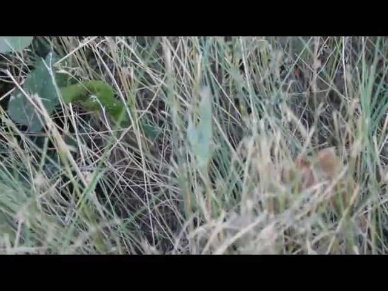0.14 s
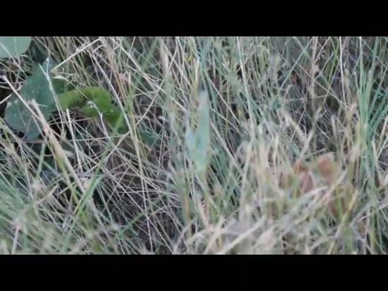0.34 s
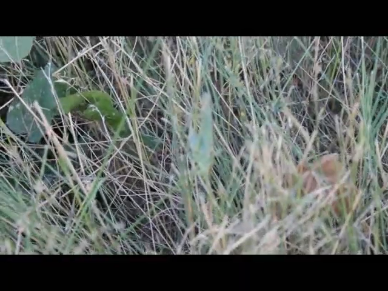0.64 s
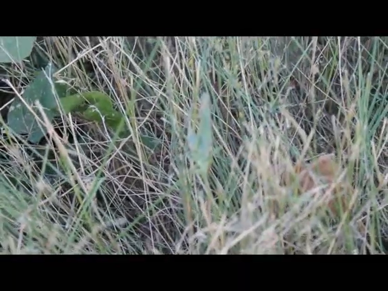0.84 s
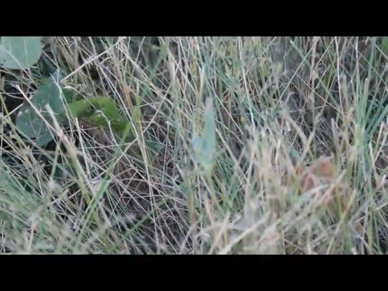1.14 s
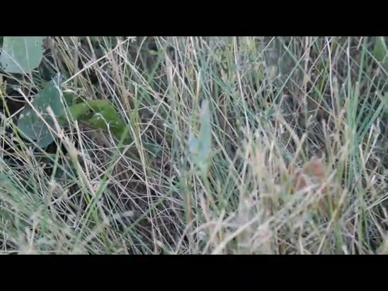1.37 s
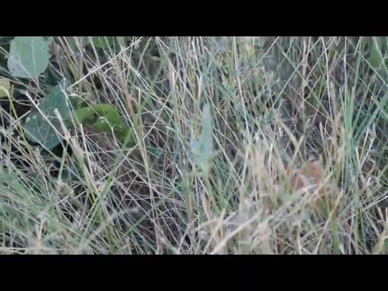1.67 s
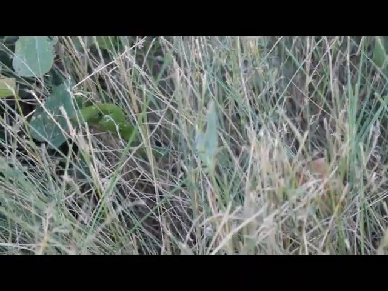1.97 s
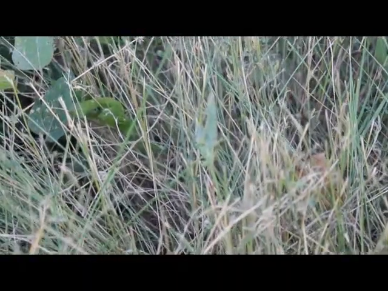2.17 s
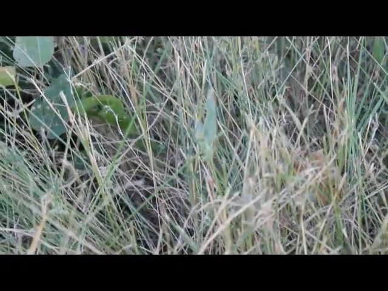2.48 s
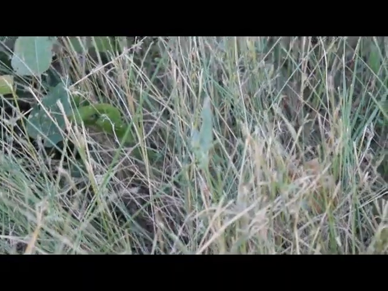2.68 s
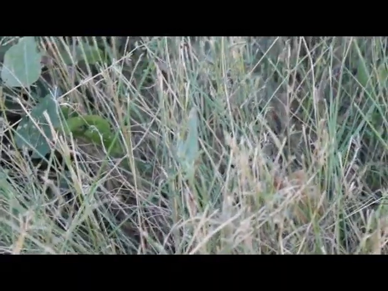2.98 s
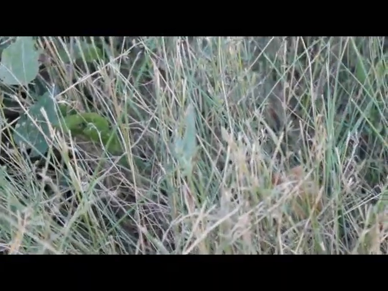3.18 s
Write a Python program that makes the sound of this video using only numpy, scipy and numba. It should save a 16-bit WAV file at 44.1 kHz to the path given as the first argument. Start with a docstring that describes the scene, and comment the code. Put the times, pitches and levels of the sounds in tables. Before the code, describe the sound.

Rapid, very high, scratchy bush-cricket trill from start to end, outdoors in dry grass, heard close with slightly crunchy, compressed sound on the right side only; soft distant chirps and faint hiss lie beneath.

```python
"""Bush-cricket in tall grass

A bush-cricket trills close by: each wing cycle is a soft opening buzz, a closing stroke, a reopening buzz
and a second closing stroke. Every tooth struck rings the wing briefly, and the grass echoes it.
A farther insect chirps in rattles of clicks, over a faint chorus of hiss, with a few low clicks.
One microphone, wired to the right channel, with a fast gain control."""
import sys
import numpy as np
from scipy import signal
from scipy.fft import rfft, irfft, next_fast_len
from scipy.io import wavfile
from scipy.ndimage import uniform_filter1d, map_coordinates
from numba import njit

SR = 44100
rng = np.random.default_rng(int(sys.argv[2]) if len(sys.argv) > 2 else 0)


def to_wav(sig):
    """Store sig (one row per channel, or 1-D mono) as 16-bit WAV at the path in sys.argv[1].

    Samples outside -1..1 are clipped; the rate is SR.
    """
    pcm = np.clip(np.atleast_2d(sig), -1, 1) * 32767
    pcm = np.round(pcm).astype(np.int16)
    wavfile.write(sys.argv[1], SR, pcm.T)  # frames by channels


def magnitude_from_level(level_db):
    """Linear magnitude for a level in decibels (20 dB per decade)."""
    exponent = np.asarray(level_db, float) / 20
    return 10 ** exponent


N = 146412  # length of the sound in samples


def cricket():
    """Four wing movements per cycle, two opening and two closing, plus the echo of the grass."""
    # first and second closing strokes: last_tooth_s, length_s, level_db, pitch_hz (before evening out)
    first_strokes = [(0.0011, 0.0049, 4.5, 11400), (0.0764, 0.018, -3.5, 11000), (0.1515, 0.016, 3, 11000),
                     (0.223, 0.015, -6.5, 9700), (0.3004, 0.014, -1, 10800), (0.3754, 0.016, -1, 11200),
                     (0.4516, 0.0142, -1, 11000), (0.5255, 0.015, -1.5, 11200),
                     (0.6016, 0.013, -0.5, 10600), (0.6802, 0.022, -0.5, 10900),
                     (0.7582, 0.027, -1.5, 10540), (0.833, 0.025, -4.4, 11400),
                     (0.9066, 0.016, -2.5, 11000), (0.9835, 0.019, -2, 11100), (1.0612, 0.019, 0.5, 11400),
                     (1.135, 0.019, -5, 11000), (1.2096, 0.016, -1.5, 11090), (1.2876, 0.021, -3, 10900),
                     (1.3617, 0.015, -3.5, 11190), (1.4371, 0.018, -5.3, 10700), (1.5103, 0.011, 0, 10900),
                     (1.5878, 0.015, -0.5, 10650), (1.6622, 0.0151, 1, 10760), (1.7377, 0.02, -2, 10530),
                     (1.8106, 0.014, -2.5, 11200), (1.8885, 0.023, -2, 10600), (1.9645, 0.018, -2, 11300),
                     (2.039, 0.015, -1, 11200), (2.1132, 0.018, -2, 10700), (2.1884, 0.019, -2, 10800),
                     (2.2627, 0.0148, -1, 10440), (2.3396, 0.017, -2.5, 10500), (2.415, 0.018, -3.5, 10950),
                     (2.4915, 0.019, -3.5, 10700), (2.567, 0.018, -3, 11200), (2.6424, 0.017, -3.5, 11000),
                     (2.7178, 0.015, -1, 10800), (2.7914, 0.011, -0.5, 11200), (2.8665, 0.018, -2.5, 10400),
                     (2.941, 0.015, -3.5, 10300), (3.018, 0.015, -1.5, 11000), (3.093, 0.017, -1, 10700),
                     (3.1674, 0.017, -4, 11400), (3.2444, 0.02, -3.5, 10450), (3.3187, 0.015, -3.5, 10800)]
    second_strokes = [(0.0278, 0.013, -8, 11800), (0.1008, 0.015, -7, 12150), (0.1763, 0.017, -8, 12200),
                      (0.2502, 0.0157, -10, 12600), (0.3259, 0.016, -6, 12700), (0.3993, 0.015, -9, 12200),
                      (0.4768, 0.015, -6.5, 12500), (0.5502, 0.0141, -6.5, 11800),
                      (0.6256, 0.014, -9, 11800), (0.703, 0.018, -8, 12350), (0.7797, 0.018, -11, 12200),
                      (0.8559, 0.014, -11, 11700), (0.9331, 0.0168, -8, 12400),
                      (1.0095, 0.017, -8.5, 12300), (1.0843, 0.018, -9, 12500),
                      (1.1604, 0.018, -10.5, 11900), (1.2346, 0.017, -8.5, 11960),
                      (1.3078, 0.013, -8.5, 11710), (1.3871, 0.0158, -8, 12300), (1.4606, 0.013, -9, 11930),
                      (1.5373, 0.012, -7.5, 12020), (1.6124, 0.015, -9.5, 12300),
                      (1.6857, 0.012, -9, 12120), (1.7613, 0.013, -8, 12200), (1.8368, 0.017, -9, 11600),
                      (1.9111, 0.013, -10, 11700), (1.9889, 0.015, -9.5, 11760.0),
                      (2.063, 0.015, -7, 12300), (2.1383, 0.015, -9.5, 12020), (2.2102, 0.0124, -7, 12070),
                      (2.2856, 0.013, -9, 11900.0), (2.3617, 0.012, -10.5, 11390),
                      (2.4391, 0.017, -10, 12300), (2.5167, 0.019, -10.5, 12000),
                      (2.5913, 0.019, -10, 11340), (2.667, 0.015, -9, 11900), (2.7433, 0.017, -11, 11750),
                      (2.8188, 0.015, -7.5, 11900), (2.8903, 0.015, -10, 12150), (2.9654, 0.013, -9, 11730),
                      (3.0412, 0.014, -10, 11600), (3.1171, 0.014, -6.5, 12080.0),
                      (3.193, 0.018, -9.5, 12200), (3.2675, 0.015, -8.5, 11660.0)]
    # teeth counted back from the end of a stroke:
    # gap_ms (to the tooth struck after it, before stretching), ring_ms, pitch_ratio
    first_teeth = [(0, .11, 1), (1.75, .11, 1.03), (1.95, .105, 1.03), (1.75, .1, 1.02), (1.4, .09, 1.03),
                   (1.1, .075, 1.06), (.65, .065, 1.07), (.7, .065, 1.06), (1.05, .075, 1.06),
                   (1.3, .075, 1.05), (1.2, .075, 1.04), (1.05, .075, 1.04), (1.15, .075, 1.03),
                   (1.25, .09, .98), (1.6, .09, .95), (1.7, .09, .94)]
    second_teeth = [(0, .12, 1), (2.3, .115, .99), (2.35, .11, .98), (2.15, .105, .96), (1.85, .1, .94),
                    (1.55, .09, .94), (1.3, .08, .95), (1.1, .07, .95), (.95, .065, .95), (.85, .065, .96),
                    (.8, .065, .96), (.8, .065, .96)]
    # strength of those same teeth, added to the level of the stroke: strength_db
    first_teeth_db = [5.5, 9, 8.5, 8.5, 8, 0.5, 7, 3.5, -4, -2, -7, -8, -5.5, -14, -8.5, -8]
    second_teeth_db = [12.9, 20.2, 18.6, 19.2, 18.6, 15.2, 11.8, 16, 12.8, 13.4, 8.5, 7]
    # wing openings before the first strokes: time_s, level_db, pitch_hz
    opening_buzzes = [(0.051, -18, 10200), (0.1261, -13.5, 9960), (0.2, -14, 9500), (0.2752, -16, 9700),
                      (0.354, -16, 8360), (0.4263, -17, 9200), (0.5054, -17.5, 8600),
                      (0.5806, -14.5, 9170.0), (0.6532, -16, 9050), (0.73, -14, 9000), (0.8086, -17, 8700),
                      (0.8807, -12.5, 9400), (0.9605, -18.5, 8700), (1.037, -14, 9400), (1.11, -17, 8600),
                      (1.1853, -16, 9600), (1.259, -18, 8800), (1.3382, -18, 8820.0), (1.4133, -18, 9300),
                      (1.489, -27, 9700), (1.564, -21, 9570.0), (1.639, -25, 9600), (1.714, -20.6, 9800),
                      (1.7864, -20, 9600), (1.8642, -12.5, 9200), (1.9378, -15, 9510), (2.013, -12, 9600),
                      (2.0905, -14.5, 8970), (2.1651, -13, 9150), (2.2403, -11, 9140),
                      (2.3123, -18, 9650.0), (2.3893, -20, 9760.0), (2.4649, -15, 9360),
                      (2.5415, -15, 9460), (2.6181, -18.5, 9510), (2.6932, -18, 9640), (2.7682, -19, 9870),
                      (2.8451, -16, 9140), (2.9206, -18, 8940), (2.9933, -18, 9250), (3.068, -14, 9530),
                      (3.1426, -14.5, 9800), (3.2182, -16, 9480), (3.295, -15, 9690.0)]
    reopen_ms, reopen_slack_s = 6.2, 0.001  # delay after the first stroke's last tooth, its scatter
    reopen_db, reopen_hz = -10, 10000
    grass_db, grass_t60_s = -16, 0.043  # echo scattered by the stalks

    stroke_ends = np.transpose(first_strokes)[0]
    slack = reopen_slack_s * rng.standard_normal(len(stroke_ends))
    reopen_s = stroke_ends + reopen_ms / 1000 + slack
    same = np.ones(len(stroke_ends))

    song = closings(first_strokes, first_teeth, first_teeth_db)
    song += closings(second_strokes, second_teeth, second_teeth_db)
    song += openings(*np.transpose(opening_buzzes))
    song += openings(reopen_s, reopen_db * same, reopen_hz * same)
    return song + magnitude_from_level(grass_db) * scatter(song, grass_t60_s)


def closings(strokes, teeth, teeth_db):
    """The scraper strikes as many teeth as fit the stroke, and each one rings three modes of the wing."""
    # side modes of the wing: pitch_ratio, level_db
    side_modes = [(0.858, -8.5), (1.199, -16)]
    gap_scatter, pitch_scatter = 0.1, 0.012  # random shares
    size_scatter_db = 1.3
    sag = 0.063  # share by which the pitch starts high and then falls within a ring
    main_mode = (1, 0.045)  # pitch ratio, dB

    gap_ms, ring_ms, ratio = np.transpose(teeth)
    end, length, stroke_db, end_hz = np.transpose(strokes)[:, :, None]
    luck = rng.standard_normal((len(strokes), 3, len(teeth)))

    # time from each tooth to the stroke's end, stretched so that the earliest tooth struck fits the length
    back = np.cumsum(gap_ms / 1000 * np.exp(gap_scatter * luck[:, 0]), 1)
    earliest = np.abs(back - length).argmin(1)[:, None]
    back = back * length / np.take_along_axis(back, earliest, 1).clip(1e-4)
    struck = np.arange(len(teeth)) <= earliest

    # each stroke's pitch lies halfway between its own value and the average
    even_hz = (end_hz + np.mean(end_hz)) / 2
    hz = (even_hz * ratio * np.exp(pitch_scatter * luck[:, 1]))[struck]
    db = (stroke_db + teeth_db + size_scatter_db * luck[:, 2])[struck]
    s = (end - back)[struck]
    ring_ms = (ring_ms + 0 * back)[struck]

    sound = np.zeros(N)
    for mode_ratio, mode_db in [main_mode] + list(side_modes):
        sound += rings(s, db + mode_db, ring_ms, hz * mode_ratio, sag, size=90)
    return sound


def openings(s, db, hz):
    """Nine lightly brushed teeth blur into a narrow buzz, strongest near its start, with a thin scratch."""
    buzz_ms, buzz_ring_ms = 6.3, 0.3
    pitch_scatter, pitch_rise = 0.03, 0.026  # shares
    scratch_hz, scratch_db, scratch_ring_ms = 13500, -10, 0.197
    scratch_spread_s = 0.011

    place = rng.random((len(s), 9))  # 0 at the start of the buzz, 1 at its end
    luck = rng.standard_normal((len(s), 9))
    when = s[:, None] + buzz_ms / 1000 * (place ** 1.5 - 0.3)
    size_db = (db[:, None] - 8 * place).ravel()
    pitch = hz[:, None] * np.exp(pitch_scatter * luck + pitch_rise * (place - 0.35))
    buzz_ring = np.full(when.size, buzz_ring_ms)
    buzz = rings(when.ravel(), size_db, buzz_ring, pitch.ravel(), 0, size=200)

    scratch_pitch = scratch_hz * np.exp(0.1 * rng.standard_normal(when.shape)).clip(0.7, 1.3)
    scratch_s = s[:, None] + scratch_spread_s * (rng.random(when.shape) - 0.5)
    scratch_ring = np.full(when.size, scratch_ring_ms)
    scratch = rings(scratch_s.ravel(), size_db + scratch_db, scratch_ring, scratch_pitch.ravel(), 0, size=120)
    return buzz + scratch


def rings(s, db, ring_ms, hz, sag, size):
    """Ringing bursts that swell to their peak at times s in three ring times, then die; pitch may sag."""
    start = (s - 3 * ring_ms / 1000) * SR
    k = np.floor(start)[:, None] + np.arange(1, size + 1)  # sample numbers of each burst
    t = (k - start[:, None]) / SR
    u = t / (ring_ms[:, None] / 1000)  # age in ring times
    bend = 1 + sag * (1 - u / 6).clip(-1)
    phase = 2 * np.pi * (hz[:, None] * t * bend + rng.random((len(s), 1)))
    envelope = (u / 3) ** 3 * np.exp(3 - u)
    wave = magnitude_from_level(db)[:, None] * envelope * np.sin(phase)
    inside = (k >= 0) & (k < N)
    return np.bincount(k[inside].astype(int), wave[inside], N)


def scatter(x, t60):
    """A dense cloud of echoes that falls 60 dB in t60 seconds, drawn anew every 75 ms."""
    out = np.zeros(N + SR)
    step = 3308  # 75 ms in samples
    t = np.arange(SR // 5) / SR
    for a in range(0, N, step):
        tail = rng.standard_normal(len(t)) * magnitude_from_level(-60 * t / t60)
        wet = signal.fftconvolve(x[a:a + step], tail / np.linalg.norm(tail))
        out[a:a + len(wet)] += wet
    return out[:N]


def far_chirps():
    """A farther insect: rattles of nearly steady clicks ring two modes, half lost in echoes."""
    # far chirps: start_s, length_s, level_db
    chirps = [(.0004, 0.056, -29), (0.177, 0.086, -26.5), (0.384, 0.1, -29.5), (0.589, 0.11, -29),
              (0.793, 0.088, -29.5), (1.002, 0.078, -31.5), (1.181, 0.088, -29.5), (1.3905, .12, -29),
              (1.5586, 0.17, -32.5), (1.786, 0.11, -28), (1.9886, 0.074, -28), (2.168, 0.09, -28.5),
              (2.337, 0.12, -30.5), (2.5673, 0.093, -29.5), (2.75, 0.11, -33.5), (2.939, 0.1, -29.5),
              (3.181, 0.11, -30)]
    # what each click rings: pitch_hz, level_db, ring_ms
    click_modes = [(5060, 0.5, 0.292), (2497, -15, 0.395)]
    clicks_per_s, edge_s = 197.5, 0.0097  # edge: time to fade in or out
    time_scatter_s, size_scatter_db, pitch_scatter = 0.000292, 1.4, 0.04
    echo_db, echo_t60_s = 3, 0.089

    start, length, chirp_db = np.transpose(chirps)[:, :, None]
    t = np.arange(30) / clicks_per_s + 0 * start
    luck = rng.standard_normal((len(chirps), 3, 30))
    # clicks past the end of the chirp are left at -80 dB
    swell = np.clip(np.minimum(t + 0.0036, length - t) / edge_s, 1e-4, 1)
    s = (start + t + time_scatter_s * luck[:, 0]).ravel()
    db = (chirp_db + 20 * np.log10(swell) + size_scatter_db * luck[:, 1]).ravel()
    detune = np.exp(pitch_scatter * luck[:, 2].ravel())

    dry_rattle = np.zeros(N)
    for hz, mode_db, ring_ms in click_modes:
        dry_rattle += rings(s, db + mode_db, np.full(s.size, ring_ms), hz * detune, 0, size=260)
    return dry_rattle + magnitude_from_level(echo_db) * scatter(dry_rattle, echo_t60_s)


def low_clicks():
    """Faint low clicks, each a brief ring."""
    # low clicks: time_s, level_db, pitch_hz, ring_ms
    click_rings = [(1.652, -38.5, 191, 1.2), (1.652, -35.5, 1440, 0.72), (2.11, -32, 910, 1.1)]
    s, db, hz, ring_ms = np.transpose(click_rings)
    return rings(s, db, ring_ms, hz, 0, size=1200)


def chorus():
    """Distant insects and air: hiss shaped in pitch, with a gently fluttering level."""
    # color of the hiss: pitch_hz, relative_level_db
    color = [(20, -45), (60, -16), (317, -13), (800, -17), (1700, -18.5), (2350, -7.5), (3100, -7.5),
             (3750, -15), (4400, -1.5), (4950, 3.5), (5500, -3), (6300, -11.5), (8000, -5), (11000, -2),
             (13500, -9.5), (15800, -9)]
    level_db, flutter_db = -33.5, 1.5
    flutter_step = 1500  # samples between random levels, 34 ms

    hz, db = np.transpose(color)
    noise = rng.standard_normal(N)
    hiss = filtered(noise, lambda f: magnitude_from_level(np.interp(np.log(f + 1), np.log(hz + 1), db)))
    random_levels = rng.standard_normal(N // flutter_step + 4)
    flutter = map_coordinates(random_levels, [np.arange(N) / flutter_step])
    return magnitude_from_level(level_db + flutter_db * flutter) * hiss / hiss.std()


def filtered(x, gain):
    """Make each pitch in x louder or softer by gain(frequency in Hz)."""
    m = next_fast_len(N + 8192)
    return irfft(rfft(x, m) * gain(np.fft.rfftfreq(m, 1 / SR)), m)[:N]


def scene():
    """Everything adds up at the one microphone, given here as two equal channels."""
    sound = cricket() + far_chirps() + low_clicks() + chorus()
    return np.array([sound, sound])


@njit
def follow(power, up, down):
    """Track the power with a quick rise and a slower fall."""
    out, held = np.empty_like(power), power[:400].mean()
    for i in range(len(power)):
        held += (up if power[i] > held else down) * (power[i] - held)
        out[i] = held
    return out


def record(dry):
    """Gain control ducks loud strokes, a limiter evens peaks, the preamplifier bends; right channel only."""
    knee_db, squeeze = -18, 0.67  # where ducking sets in, its strength
    grab_ms, let_go_ms = 3.09, 9.62
    roof = 0.72  # limiter ceiling for the swing
    bend = 0.017  # lopsidedness of the preamplifier
    crackle_db, crackle_hz = -34, 3160  # hiss that rides on loud sound, where its treble starts to fade
    low_cut_hz, top_hz = 45, 15830  # bass roll-off, sharp treble cut

    up, down = 1000 / (grab_ms * SR), 1000 / (let_go_ms * SR)
    held = uniform_filter1d(follow(dry[1] ** 2, up, down), size=41)
    x = dry[1] * (1 + held / magnitude_from_level(knee_db) ** 2) ** (-squeeze / 2)

    # the swing is the outline of the wave's peaks
    swing = uniform_filter1d(np.abs(signal.hilbert(x)), size=9)
    x = x / (1 + (swing / roof) ** 4) ** (1 / 4)

    hiss = filtered(rng.standard_normal(N), lambda f: 1 / (1 + (f / crackle_hz) ** 2))
    crackle = magnitude_from_level(crackle_db) * np.minimum(swing, roof) * hiss
    bent = x + bend * x ** 2 + crackle
    x = filtered(bent, lambda f: (f < top_hz) * f ** 2 / (f ** 2 + low_cut_hz ** 2))
    return np.array([0 * x, x])


dry = scene()
out = record(dry)
to_wav(out)
```